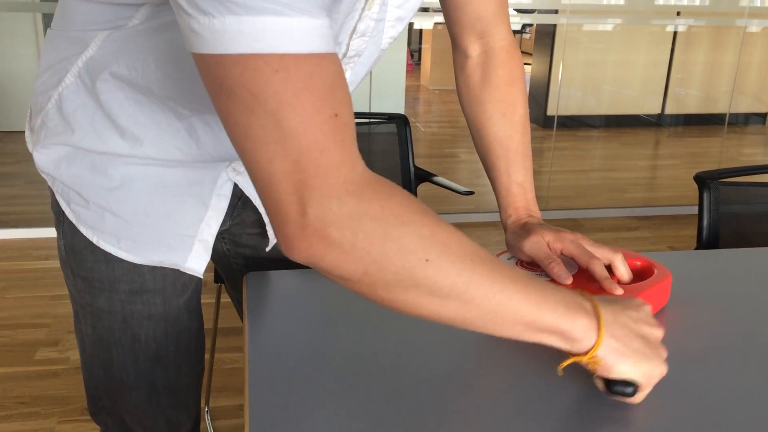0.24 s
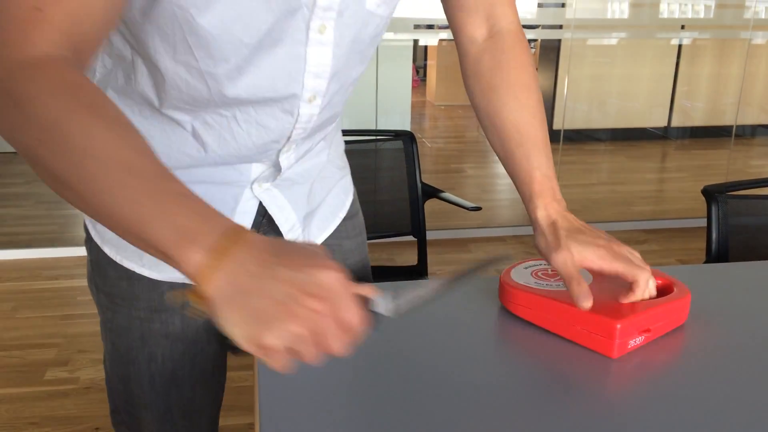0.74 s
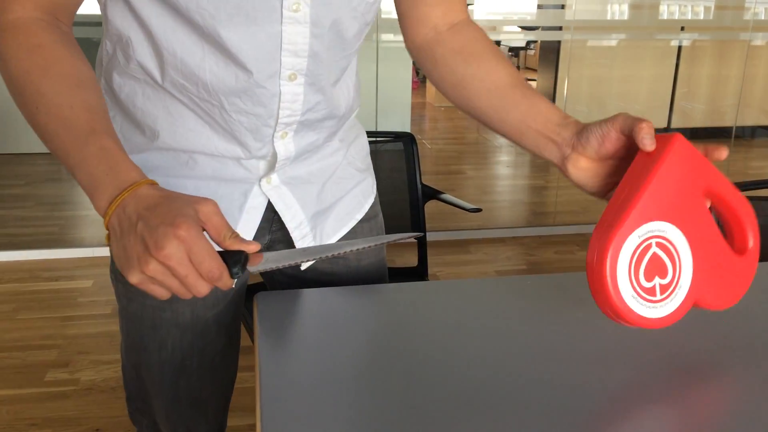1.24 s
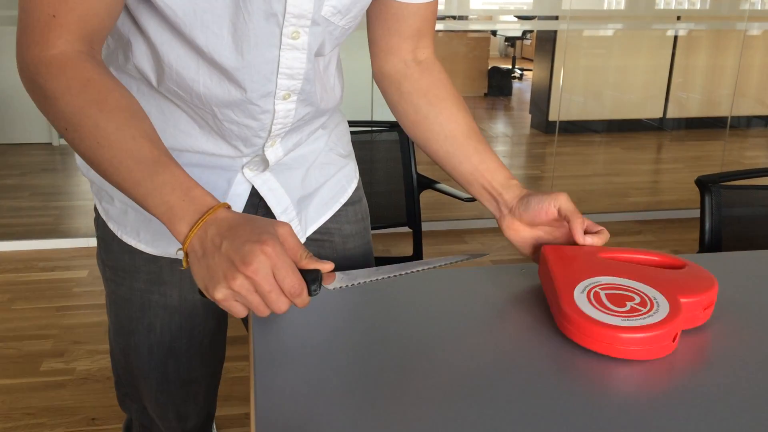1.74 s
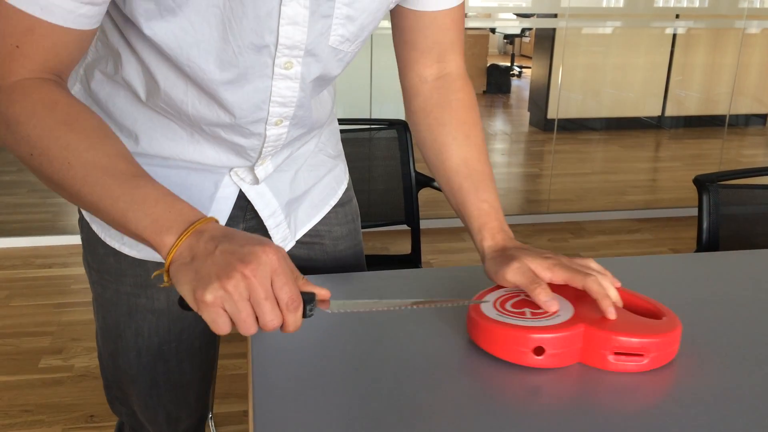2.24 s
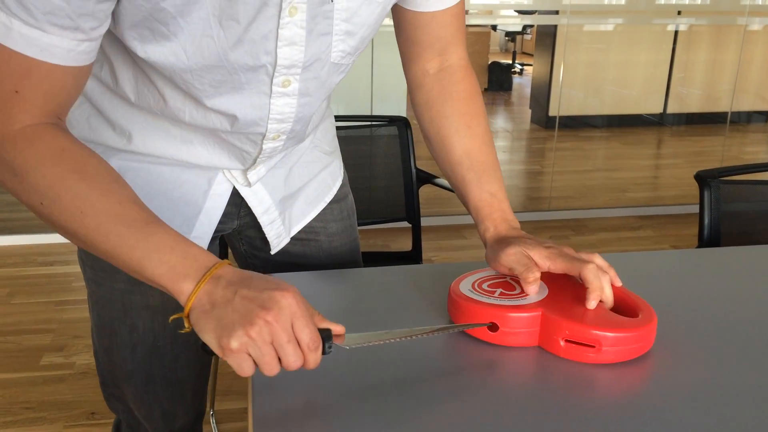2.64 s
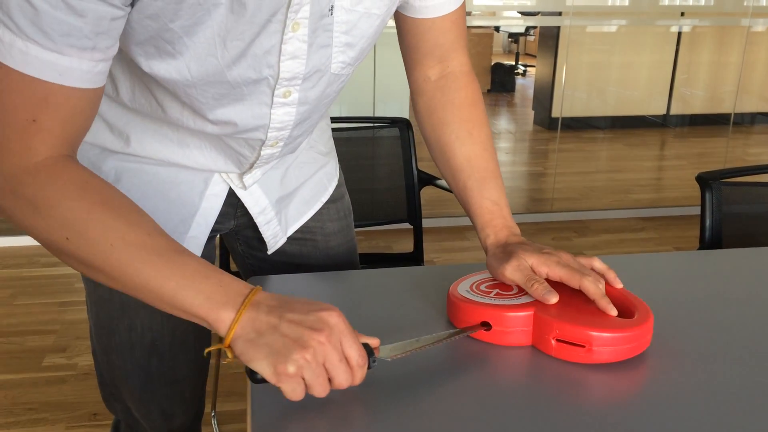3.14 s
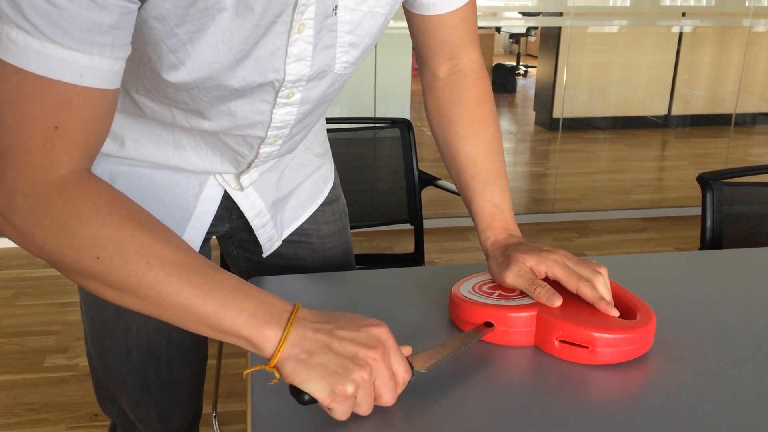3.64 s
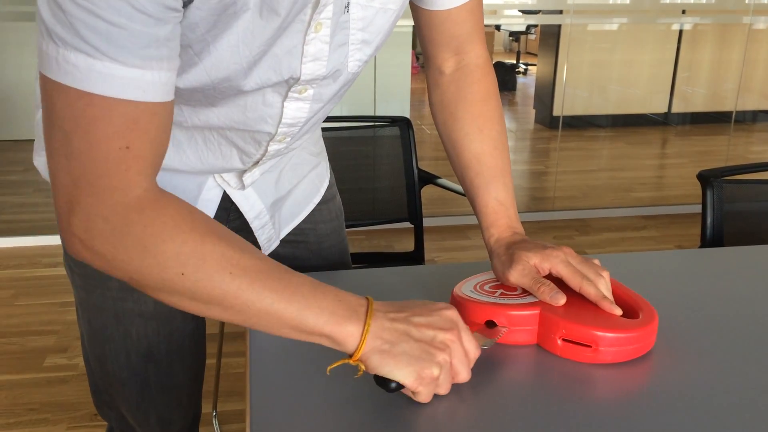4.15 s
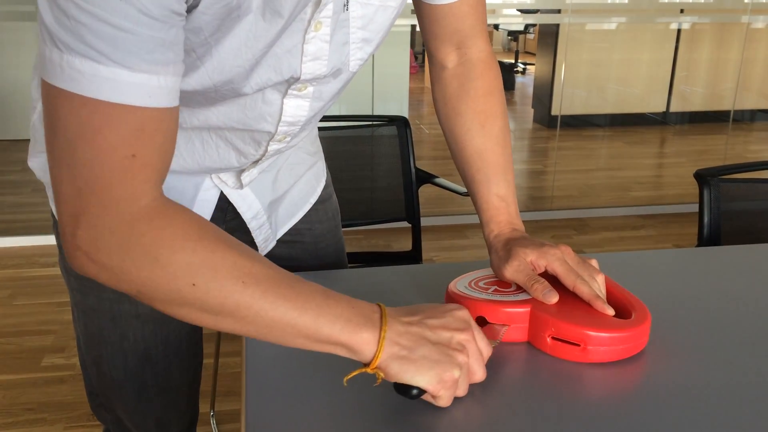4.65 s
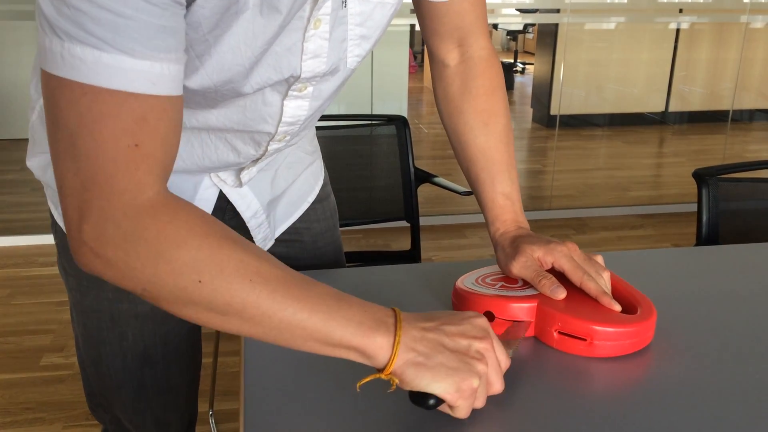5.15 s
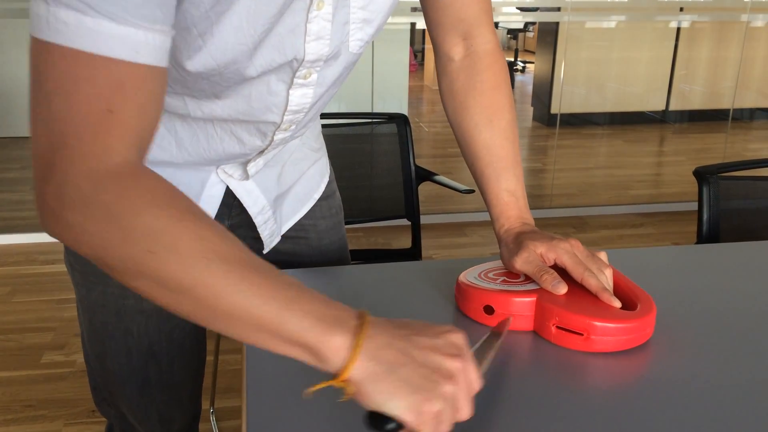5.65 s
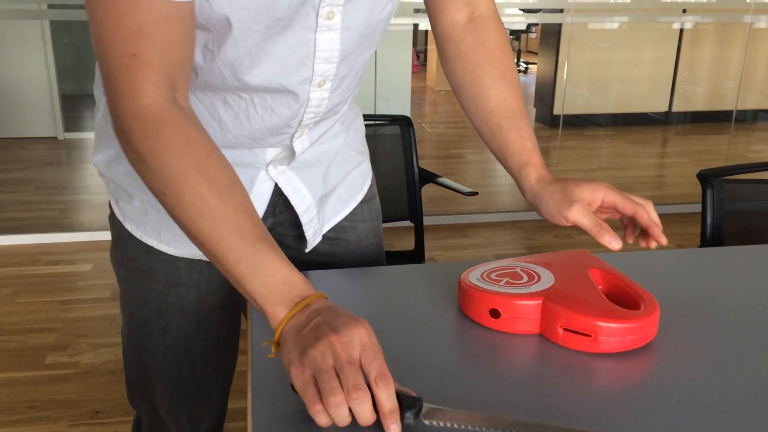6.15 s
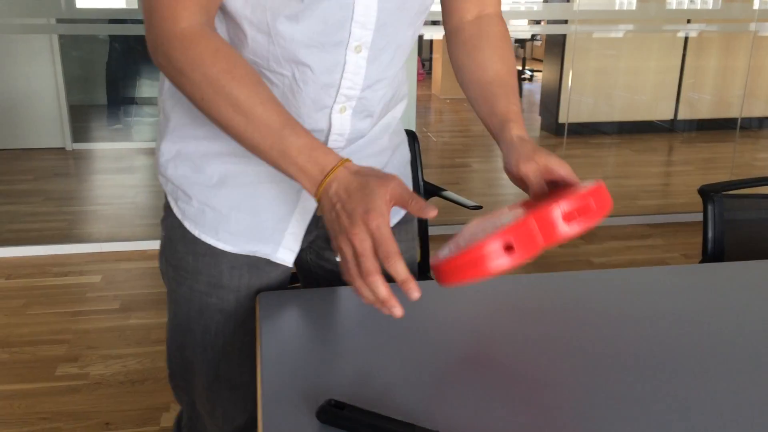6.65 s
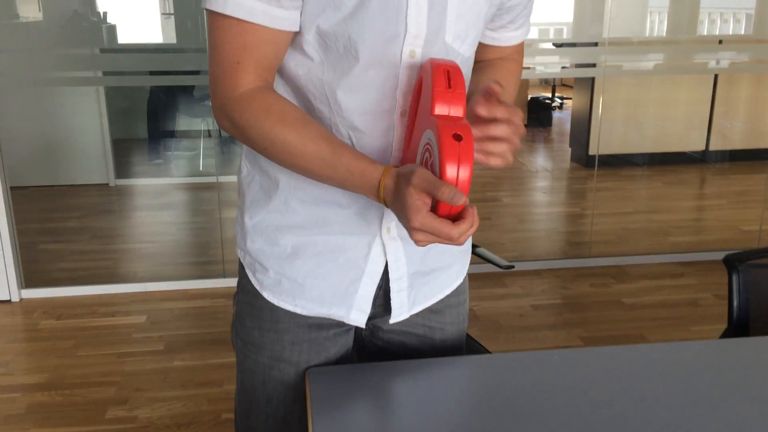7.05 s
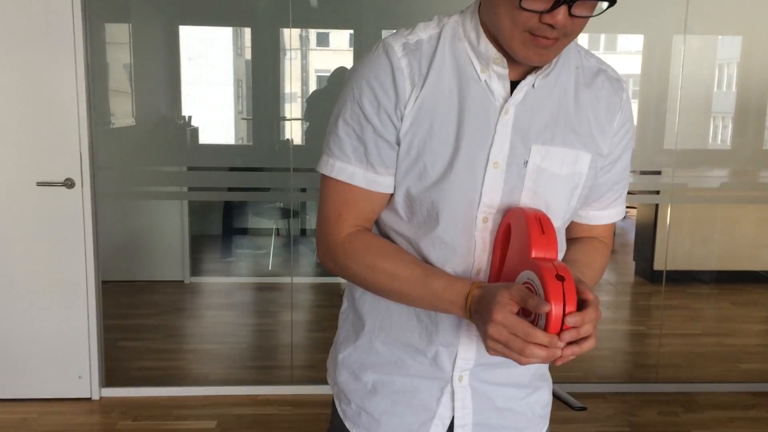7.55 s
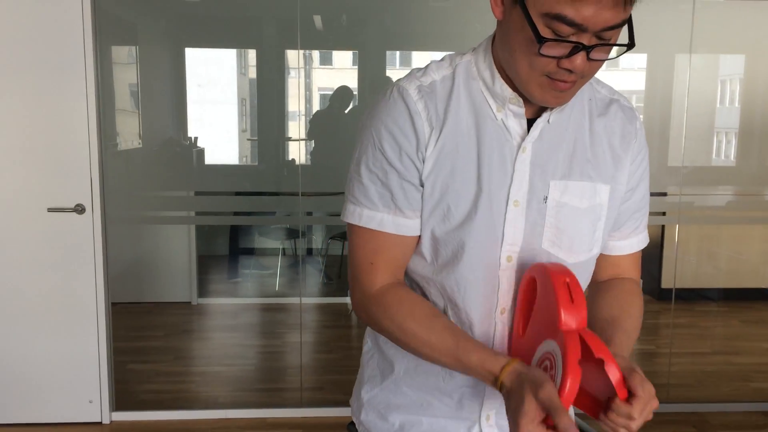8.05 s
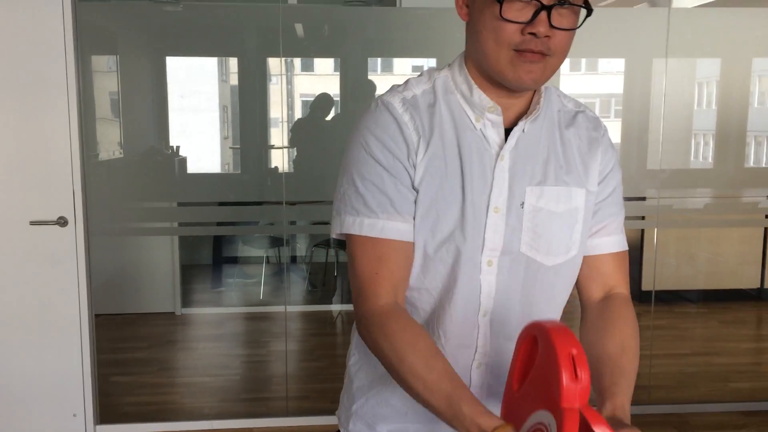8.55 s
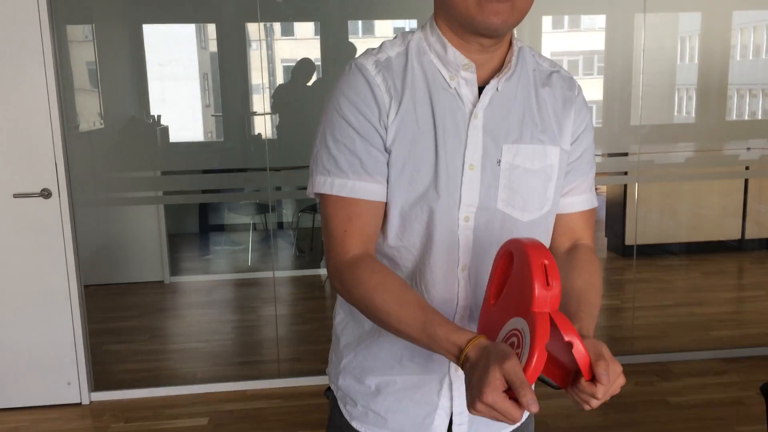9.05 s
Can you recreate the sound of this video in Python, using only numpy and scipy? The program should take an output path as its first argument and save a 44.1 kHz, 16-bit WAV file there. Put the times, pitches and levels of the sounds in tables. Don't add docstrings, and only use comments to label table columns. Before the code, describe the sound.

A knife rasps out of a hollow plastic sharpener, which clunks down and slides, is worked again, then snaps open loudly in a quiet room.

```python
import sys
import numpy as np
from scipy import signal
from scipy.fft import rfft, irfft, next_fast_len
from scipy.io import wavfile

SR = 44100
rng = np.random.default_rng(int(sys.argv[2]) if len(sys.argv) > 2 else 0)


def boost_factor(decibels):
    exponent = np.asarray(decibels, float) / 20
    return 10 ** exponent


def transcribe(signal):
    frames = np.atleast_2d(signal).T
    limited = np.clip(frames, -1, 1)
    pcm = np.round(limited * 32767).astype(np.int16)
    wavfile.write(sys.argv[1], SR, pcm)


N = 410571

# freq_hz, density_db_per_hz
AIR_SPECTRUM = [(20, -21.5), (45, -8.5), (134, -5.5), (357, -20), (527, -28.5), (1290, -32.5), (5080, -42),
                (6720, -42.5), (16000, -47.5)]
# centre_hz, t60_s, tail_db
ROOM_BANDS = [(123, 0.43, 1), (273, 0.31, -8.5), (700, 0.58, -12), (1570, 0.66, -17), (3000, 0.66, -20.5),
              (6000, 0.36, -19), (11580, 0.24, -21.5)]
# delay_s, level_db
GLASS_ECHOES = [(0.033, -25), (.039, -20.5), (.068, -25.5), (0.086, -22.5)]

# freq_hz, level_db, t60_s
TABLE_MODES = [(60, -12.5, 0.18), (87, -7, 0.43), (132.2, -3, 0.4), (183.4, 4.5, 0.23), (230, 6, 0.28)]
SHELL_ON_TABLE_MODES = [
    [(263, -7, 0.075), (376, 0.5, 0.038), (528, 0.5, 0.041), (572, 2, 0.024), (740, -6.5, 0.011)],
    [(860, -11.5, 0.015), (1100, -1.5, 0.013), (1520, -4, 0.011), (2100, -6.5, 0.0017)],
    [(3700, 13, 0.0026), (5240, -25, 0.012)],
]
HANDLE_MODES = [
    [(420, -6, 0.05), (735, -15, 0.0076)],
    [(779, 1, 0.025), (1070, 2.5, 0.013), (1263, 2, 0.025), (1870, -1, 0.0027)],
    [(2780, 6.5, 0.0049), (4040, 6, 0.0031), (6100, -2.5, 0.0059)],
]
SHELL_IN_HAND_MODES = [
    [(372, -15.5, 0.038), (700, 5, 0.014), (821, 2, 0.007)],
    [(1000, 3, 0.0065), (1250, 6, 0.019), (2000, 3, 0.0035)],
    [(2840, -5, 0.00079), (4100, -4.5, 0.0086), (6014, -1.5, 0.0011)],
]
SHELL_HELD_MODES = [
    [(290, 2.5, 0.03), (398, 14, 0.018), (460, 14, 0.023), (565, 9.5, 0.013), (760, -14.5, 0.0098)],
    [(1037, 4.5, 0.015), (1461, 5, 0.0065), (1864, 4, 0.0078), (2400, 2, 0.0062)],
    [(3170, 2, 0.0031), (4030, -0.5, 0.0035), (5170, -9, 0.0042), (6500, -16.5, 0.005)],
]
# freq_hz, level_db, t60_s
LIFTED_HOLLOW_MODES = [(430, 6, 0.0085), (535, 3.5, 0.052), (588, -8, 0.08), (747, 1, 0.021)]
# freq_hz, level_db, t60_s
EDGE_MODES = [(1150, -1.5, .006), (1800, -0.5, 0.0069), (2670, 1, 0.0031), (4030, 4, 0.0043),
              (5700, 0, 0.0035), (8200, -13.5, .0015), (11500, -13, 0.00093)]
TIP_MODES = [(990, -5.5, 0.044), (1620, -8, 0.065), (1800, -0.5, 0.06)]
BLADE_MODES = [(3140, 3.5, .012), (3630, -2, .008), (5390, -5.5, 0.0035)]

# start_s, level_db
TABLE_THUMPS = [(0.254, -32), (1.449, -25.5), (1.472, -24), (1.522, -31), (1.657, -47.5), (1.894, -32),
                (1.948, -23.5), (2.003, -26.5), (2.047, -25.5), (2.185, -35), (3.911, -30), (4.06, -47),
                (5.181, -44), (5.96, -43.5), (6.406, -37.5), (6.463, -41), (6.822, -34.5)]
# start_s, hollow_db, walls_db, edges_db, struck_spot_hz
SHELL_SET_DOWNS = [(1.446, -14.5, -17, -29.5, 580), (1.468, -28.5, -28.5, -45, 610),
                   (1.521, -22.5, -29.5, -45.5, 700), (1.572, -36.5, -41.5, -70, 800),
                   (1.79, -54, -57, -71, 535), (1.896, -36, -28.5, -43, 1190),
                   (1.95, -17.5, -24.5, -31.5, 460), (1.968, -30, -35, -50, 400),
                   (1.986, -38, -34.5, -50, 460), (2.014, -21, -29, -51, 480), (2.105, -44, -59, -65, 298),
                   (2.006, -20, -26, -36.5, 463), (2.046, -20.5, -30, -37.5, 497),
                   (2.068, -28, -36, -51, 585), (2.085, -34, -38.5, -62, 424),
                   (1.955, -15, -21.5, -42, 625)]
HANDLE_HITS = [
    (6.404, -44.5, -27.5, -40, 1960),
    (6.421, -38.5, -21, -38, 1500),
    (6.463, -44.5, -26.5, -43, 1760),
    (6.482, -40, -31, -60.5, 900),
    (6.518, -47, -40.5, -63.5, 750),
    (0.845, -47.5, -35, -34, 720),
]
CATCH_RELEASE = [
    (8.632, -62.5, -57.5, -78, 2320),
    (8.644, -44.5, -54, -70.5, 3015),
    (8.656, -12.5, -14.5, -17, 1103),
]
FINGER_TAPS = [(1.068, -48, -72, -72, 430), (1.09, -56, -52, -57, 700), (1.229, -31.5, -35, -43, 576),
               (1.385, -57, -59, -63, 550), (6.828, -31, -24, -24.5, 430), (7.4, -42, -41.5, -64.5, 1060),
               (7.449, -73.5, -65, -66, 930), (7.506, -49, -59, -63, 434), (7.644, -86, -64.5, -65.5, 2370),
               (7.835, -37, -36.5, -40, 543), (7.973, -53, -53.5, -56, 2100),
               (8.168, -78, -63.5, -59, 4100), (8.439, -83, -65, -63, 1934)]
FIRST_SLOT_HITS = [
    (0.048, -34, -60, -48, 700),
    (0.215, -36, -61, -41, 1300),
    (0.241, -28.5, -33.5, -31.5, 1110),
    (0.251, -26, -28, -23.5, 5000),
    (0.608, -30.5, -60, -51, 3170),
    (0.629, -36, -29.5, -34.5, 3060),
]
SECOND_SLOT_HITS = [(2.912, -57.5, -57.5, -60.5, 632), (2.996, -57.5, -59, -67, 2400),
                    (3.178, -51.5, -50, -83, 1630), (3.24, -70, -46.5, -68, 1840),
                    (3.284, -39, -44, -47.5, 2450), (3.773, -42.5, -41.5, -77, 457),
                    (3.888, -38, -43, -55.5, 1110), (3.911, -13, -20.5, -18.5, 300),
                    (3.99, -30.5, -30, -50, 1470), (4.283, -30.5, -28, -39, 2280),
                    (4.437, -41.5, -78, -54, 420), (4.5, -40, -49, -53, 1020),
                    (5.075, -35.5, -36.5, -62, 420), (5.399, -37.5, -53, -46.5, 1725),
                    (5.687, -33, -36.5, -38, 740), (5.704, -60.5, -28.5, -49, 1500),
                    (5.724, -63, -47, -28, 4100), (5.767, -44, -62, -45, 453),
                    (5.883, -39.5, -45, -51.5, 1150), (5.963, -27.5, -26.5, -37, 420),
                    (6.107, -48, -77, -56.5, 615)]
# start_s, level_db, pitch_hz
EDGE_TICKS = [(.09, -49, 3350), (0.244, -37, 11000), (.252, -26, 11050), (.077, -52, 3400),
              (0.459, -51, 3000), (0.468, -40, 3200), (0.541, -37, 3500), (0.574, -40, 2500),
              (0.629, -42, 3000), (1.068, -59, 1103), (1.228, -53, 1692), (1.352, -66, 3570),
              (1.447, -44, 10860), (1.95, -35, 11100), (2.007, -45.5, 8970), (2.046, -48, 9000),
              (3.741, -55.5, 2000), (3.764, -56, 3000), (5.707, -30, 2000), (3.913, -25, 4000),
              (3.99, -43, 1800), (4.076, -46, 5000), (4.135, -56, 5050), (4.283, -30.5, 2400),
              (4.497, -42, 3000), (4.527, -55, 3400), (4.552, -47, 2800), (4.589, -47, 3000),
              (4.698, -51, 6500), (4.736, -62, 3000), (8.644, -52, 9000), (4.939, -43, 3000),
              (4.97, -52, 3470), (5.011, -55, 3000), (5.054, -49, 2500), (5.127, -54, 1500),
              (5.14, -36, 1500), (5.16, -46, 2500), (5.179, -37, 1510), (5.188, -31, 1310),
              (0.956, -41.5, 1060), (5.73, -31, 3480), (5.966, -32.5, 1060), (0.789, -42, 1100),
              (6.476, -42, 1205), (.851, -33, 2000), (6.62, -38, 1400), (6.64, -48, 1480),
              (6.829, -27.5, 1800), (7.401, -49.5, 1150), (7.837, -30.5, 8750)]

# time_s, level_db
TIP_SONG_CURVE = [(3.1, -74), (3.17, -59.5), (3.3, -50.5), (3.419, -63.5), (3.52, -69), (3.559, -83)]
PUSH_SONG_CURVE = [(.04, -67), (.075, -47), (.095, -49.5), (.115, -58)]
DRAW_SONG_CURVE = [(.45, -65), (.465, -45), (.53, -37.5), (.547, -30), (.58, -48), (.595, -56), (.608, -47),
                   (.625, -59)]

# peak_s, rise_s, fall_s, wall_rasp_db, drone_re_rasp_db
HAND_STROKES = [(.39, 0.065, 0.11, -54, -13), (.65, .01, .035, -55.5, -9), (.79, .015, 0.017, -53, -5),
                (.847, .008, .02, -43, -9.5), (.81, 0.39, 0.16, -59.5, 0), (.87, 0.049, 0.066, -56.5, -7),
                (.955, 0.059, 0.046, -48, -4.5), (.995, 0.032, 0.034, -53.5, -8.5),
                (1.018, 0.028, 0.043, -59, 2.5), (1.13, 0.16, 0.96, -60.5, 12),
                (1.29, 0.055, 0.036, -59.5, -16.5), (1.6, .015, 0.14, -53.5, 5),
                (1.77, 0.15, 0.15, -67.5, 20.5), (6.075, 0.07, 0.11, -58, -3),
                (7.0, 0.98, 0.34, -57.5, -21.5), (7.3, 0.066, 0.057, -59, -10),
                (7.858, 0.02, 0.041, -52, 10), (7.98, 0.098, 0.14, -53.5, 3),
                (8.145, 0.039, 0.041, -54, -13)]
SLIDE_STROKES = [(2.245, 0.063, 0.16, -34, -3.5), (2.34, 0.071, 0.046, -38.5, -7),
                 (2.5, 0.7, 0.22, -55, -0.5), (2.7, 0.056, 0.11, -59, 4.5),
                 (2.79, 0.044, 0.061, -60.5, 5.5), (3.916, 0.0034, .04, -42, -3),
                 (6.565, 0.012, 0.12, -51, 11), (7.1, 0.034, 0.036, -61.5, 5),
                 (7.765, .06, 0.077, -59.5, 2)]
DULL_STROKES = [(1.884, 0.025, 0.055, -51, 16.5), (1.91, 0.0056, 0.025, -34, 14),
                (2.19, 0.06, 0.047, -48, 14.5), (3.265, 0.24, 0.16, -53, -0.5),
                (3.4, 0.35, 0.23, -61.5, -7.5), (3.54, 0.036, 0.027, -55.5, 9.5),
                (5.172, 0.073, 0.057, -27.5, -1.5), (6.482, 0.014, .035, -41, 4),
                (6.575, .02, 0.021, -51, 6), (6.44, 0.05, 0.075, -47, 15.5), (6.51, 0.027, 0.04, -44, 3),
                (6.548, 0.016, .03, -46, 5), (6.625, 0.029, 0.025, -44.5, 1.5),
                (6.858, 0.0073, 0.019, -50, -4)]
SLOT_STROKES = [(0.088, 0.16, 0.045, -39.5, -3.5), (0.238, 0.091, 0.02, -39.5, -3),
                (0.263, 0.0069, 0.031, -38, -30), (0.28, 0.066, 0.031, -46, 17.5),
                (.453, 0.015, 0.036, -48, 9.5), (0.485, 0.058, 0.041, -36.5, 0.5),
                (.52, 0.062, 0.048, -34, -4), (.547, 0.013, 0.052, -28.5, -10),
                (0.572, 0.027, 0.022, -27, -8), (0.605, 0.017, 0.042, -44.5, 3),
                (1.25, 0.017, 0.037, -45, -11.5), (3.775, 0.04, 0.032, -47.5, 3),
                (3.812, 0.037, 0.026, -44, 8), (3.89, 0.01, 0.026, -43, 4), (3.929, 0.023, 0.025, -30.5, 7),
                (3.997, 0.095, 0.012, -45, 3), (4.05, 0.16, 0.33, -39.5, 1), (3.96, .04, 0.085, -39.5, -1),
                (5.375, 0.028, 0.021, -50.5, -10), (5.455, .04, .03, -55.5, 3),
                (4.27, 0.04, 0.022, -55, -19), (4.298, 0.013, 0.03, -49, -16),
                (4.338, 0.065, 0.066, -45, -9.5), (4.24, 0.0092, 0.014, -56.5, 15),
                (4.52, 0.13, 0.12, -43.5, -2.5), (4.595, 0.081, 0.048, -48, 1),
                (4.76, 0.089, 0.08, -44.5, 0.5), (4.83, 0.013, 0.011, -61.5, 20),
                (4.87, 0.027, 0.056, -54, -15), (4.95, 0.057, 0.052, -41, -6.5),
                (4.99, 0.048, 0.066, -39.5, -6.5), (5.022, 0.067, 0.037, -41, -2),
                (5.068, 0.021, 0.022, -49, 10.5), (5.406, 0.088, 0.085, -46.5, 0.5),
                (5.645, 0.067, 0.086, -47, -4.5), (5.705, 0.041, 0.057, -27.5, -14.5),
                (5.728, 0.043, 0.048, -30.5, -20), (5.755, 0.025, 0.018, -37.5, -6.5)]
# freq_hz, density_db_per_hz
GRIT_SPECTRUM = [(1000, -12), (4000, 0), (6000, -2.5), (9000, -6.5), (12000, -10.5), (16000, -9.5)]

STROKE_DEPTH_DB, STROKE_ROUNDNESS = 23, 1.49
GRIT_FOLLOWS, USUAL_RASP_DB = 1, -50.5
HARD_BLOW_DB, BRIGHTER_DB_PER_DB = -25.5, 0.18


def rms_one(x):
    return x / np.sqrt(np.mean(x ** 2) + 1e-20)


def butter(x, order, hz, kind):
    return signal.sosfilt(signal.butter(order, hz, kind, fs=SR, output="sos"), x)


def coloured(x, spectrum):
    size = next_fast_len(len(x))
    hz, db = np.transpose(spectrum)
    bin_hz = np.fft.rfftfreq(size, 1 / SR)
    gain = rms_one(boost_factor(np.interp(np.log(bin_hz + 1), np.log(hz), db)))
    return irfft(rfft(x, size) * gain, size)[:len(x)]


def drift(rate_hz):
    r = np.exp(-2 * np.pi * rate_hz / SR)
    return rms_one(signal.lfilter([1], [1, -2 * r, r * r], rng.standard_normal(N)))


def body(drive, modes):
    out, total_power = 0, 0
    for k, (hz, db, t60_s) in enumerate(modes):
        r = boost_factor(-60 / (t60_s * SR))
        w = 2 * np.pi * hz / SR
        gain = (-1) ** k * boost_factor(db) * np.sqrt((1 - r * r) / 2)
        poles = [1, -2 * r * np.cos(w), r * r]
        out = out + signal.lfilter([gain, 0, -gain], poles, drive(hz) + 1e-18)
        total_power += boost_factor(db) ** 2
    radiated_hz = [.65 * modes[0][0], 1.7 * modes[-1][0]]
    return butter(out, 2, radiated_hz, "band") / np.sqrt(total_power)


def chatter(s, db, length_s, spot_hz, swell, favour_db, lead=0, duller_db=0):
    size = 1024
    age = np.arange(1, size + 1) / SR / np.clip(length_s, 1e-6, .008)[:, None]
    shape = age ** swell * np.exp(-(age - age[:, :1]) * (1 + swell))
    uneven = boost_factor(3 * rng.standard_normal(age.shape))
    contacts = rng.standard_normal(age.shape) * uneven * shape
    burst_size = np.sqrt(np.sum(contacts ** 2, axis=1))
    contacts[:, 0] += lead * np.copysign(burst_size, contacts[:, 0])
    contacts *= np.sqrt(SR / 100 / np.sum(contacts ** 2, axis=1, keepdims=True))
    at = (s[:, None] * SR).astype(int) + np.arange(size)

    def drive(hz):
        octaves = np.log2(hz / spot_hz)
        near_spot = np.exp(-(octaves / .3) ** 2)
        gain = boost_factor(db + favour_db * near_spot - duller_db * np.maximum(octaves, 0))
        return np.bincount(at.ravel(), (contacts * gain[:, None]).ravel(), N + size)[:N]

    return drive


def knocks(rows, modes, length_s, crack_db, crack_hz, spread):
    s, hollow_db, walls_db, edge_db, spot_hz = np.transpose(rows)
    burst_s = spread * (length_s + 0 * s)
    lag_s = (1 - spread) * .0045
    hollow = chatter(s, hollow_db, burst_s, spot_hz, swell=0.15, favour_db=8.5, lead=0.11)
    walls = chatter(s + lag_s, walls_db - 1.5, burst_s, spot_hz, swell=0.23, favour_db=8.0, lead=0.56)
    edges = chatter(s + 2 * lag_s, edge_db - 4.5, 0.81 * burst_s, spot_hz,
                    swell=0.083, favour_db=4.5, lead=.3)
    out = body(hollow, modes[0]) + body(walls, modes[1]) + body(edges, modes[2])
    force_db = BRIGHTER_DB_PER_DB * (edge_db - HARD_BLOW_DB)
    crack = chatter(s, edge_db + crack_db + force_db, .2 * burst_s, spot_hz, swell=.1, favour_db=0)(1)
    crack = butter(crack, 2, 1400, "high")
    return out + butter(crack, 2, crack_hz, "low")


def grains(per_s, size_db, clump_db):
    sizes = boost_factor(size_db * np.minimum(rng.exponential(1, N), 4)) * rng.choice([-1, 1], N)
    happens = rng.random(N) < per_s / SR
    return rms_one(sizes * happens * boost_factor(clump_db * drift(22)))


def strokes(rows, grit_db):
    level = np.zeros((3, N))
    for s, rise_s, fall_s, db, drone_db in rows:
        at = np.arange(max(int((s - rise_s) * SR), 0), int((s + fall_s) * SR))
        away = np.abs(at / SR - s) / np.where(at / SR < s, rise_s, fall_s)
        rasp_db = db - STROKE_DEPTH_DB * away ** STROKE_ROUNDNESS
        hiss_db = USUAL_RASP_DB + grit_db + GRIT_FOLLOWS * (rasp_db - USUAL_RASP_DB)
        ends = np.clip(10 * (1 - away), 0, 1)
        level[:, at] += boost_factor(np.array([rasp_db + drone_db, rasp_db, hiss_db])) * ends
    return level


def air_handling():
    level_db = -59 + 0.35 * drift(2.0)
    return boost_factor(level_db) * rms_one(coloured(rng.standard_normal(N), AIR_SPECTRUM))


def room(x):
    t = np.arange(SR) / SR
    tail = 0
    for hz, t60_s, db in ROOM_BANDS:
        band = butter(rng.standard_normal(SR), 2, [hz / 1.15, min(hz * 1.77, 19000)], "band")
        unit_energy = np.sqrt(2 * np.log(1000) / t60_s / SR)
        tail = tail + band * boost_factor(db - 60 * t / t60_s) * unit_energy
    tail = tail * np.clip((t - .004) / 0.0061, 0, 1)
    for delay_s, db in GLASS_ECHOES:
        tail[int(delay_s * SR)] += boost_factor(db - 16.0)
    return signal.fftconvolve(x, tail)[:N]


def table_thumps():
    s, db = np.transpose(TABLE_THUMPS)
    push = np.abs(chatter(s, db - 13.0, 0.0012 + 0 * s, 186, swell=0.31, favour_db=0)(1))
    return body(lambda hz: push, TABLE_MODES)


def table_knocks(spread):
    shell = knocks(SHELL_SET_DOWNS, SHELL_ON_TABLE_MODES, length_s=0.013,
                   crack_db=2.0, crack_hz=7260, spread=spread)
    handle = knocks(HANDLE_HITS, HANDLE_MODES, length_s=0.042,
                    crack_db=-0.5, crack_hz=4900, spread=spread)
    return shell + handle


def finger_taps(spread):
    modes = (LIFTED_HOLLOW_MODES, *SHELL_HELD_MODES[1:])
    return knocks(FINGER_TAPS, modes, length_s=0.0084, crack_db=-17.5, crack_hz=5840, spread=spread)


def catch_snap(spread):
    return knocks(CATCH_RELEASE, SHELL_IN_HAND_MODES, length_s=0.0039,
                  crack_db=0.5, crack_hz=7020, spread=spread)


def blade_knocks(spread):
    rows = list(FIRST_SLOT_HITS) + list(SECOND_SLOT_HITS)
    return knocks(rows, SHELL_HELD_MODES, length_s=0.008, crack_db=-5, crack_hz=6190, spread=spread)


def all_knocks(spread, aloft_db):
    on_table_or_held = table_knocks(spread) + finger_taps(spread) + blade_knocks(spread)
    return on_table_or_held + boost_factor(aloft_db) * catch_snap(spread)


def edge_ticks():
    s, db, hz = np.transpose(EDGE_TICKS)
    contacts = chatter(s, db - 12.0, 0.00023 + 0 * s, hz, swell=0.12, favour_db=16, duller_db=5.5)
    return body(contacts, EDGE_MODES)


def song_level(curve):
    return boost_factor(np.interp(np.arange(N) / SR, *np.transpose(curve), -200, -200))


def blade_song():
    slips = grains(3000, size_db=2.5, clump_db=2.2)
    tip_drive = slips * song_level(TIP_SONG_CURVE)
    blade_drive = slips * (song_level(PUSH_SONG_CURVE) + song_level(DRAW_SONG_CURVE))
    return body(lambda hz: tip_drive, TIP_MODES) + body(lambda hz: blade_drive, BLADE_MODES)


def rubbing():
    resting = strokes(SLOT_STROKES, grit_db=-20.5)
    resting += strokes(DULL_STROKES, grit_db=-29.5)
    resting += strokes(SLIDE_STROKES, grit_db=-6.5)
    lifted = strokes(HAND_STROKES, grit_db=-13.5)
    _, rasp_gain, grit_gain = resting + lifted
    slips = grains(2500, size_db=1.0, clump_db=1.7)
    grit = grains(8300, size_db=3.0, clump_db=1.5)
    bumps = grains(500, size_db=2.5, clump_db=1.8)

    hollow, walls, edges = SHELL_HELD_MODES
    finger_damped = [(hz, db, 0.49 * t60_s) for hz, db, t60_s in LIFTED_HOLLOW_MODES]
    drone = body(lambda hz: bumps * resting[0], hollow)
    drone += body(lambda hz: bumps * lifted[0], finger_damped)
    drone += boost_factor(-16.0) * body(lambda hz: bumps * resting[0], TABLE_MODES)

    rubbed = [(hz, db, 1.1 * t60_s) for hz, db, t60_s in walls + edges]
    rasp = body(lambda hz: slips * rasp_gain * boost_factor(2.1 * drift(30)), rubbed)
    return drone + boost_factor(-4.0) * rasp + coloured(grit, GRIT_SPECTRUM) * grit_gain


def scene():
    friction = rubbing() + blade_song() + edge_ticks()
    direct = all_knocks(spread=1.0, aloft_db=0.5) + table_thumps() + friction
    reverberant = room(all_knocks(spread=0, aloft_db=13.0) + friction)
    return (direct + reverberant + air_handling())[None]


def band_limit(x):
    return signal.sosfilt(signal.butter(12, 16810, fs=SR, output="sos"), x)


def record(dry):
    duck_above, duck_db, hold = .58, -7, int(.27 * SR)
    mix = butter(dry, 2, 45, "high")
    loud_count = np.cumsum(np.abs(mix[0]) > duck_above)
    recently_loud = loud_count > np.concatenate([np.zeros(hold), loud_count[:-hold]])
    mix = mix * boost_factor(duck_db * signal.lfilter([.001], [1, -.999], recently_loud))
    ceiling = .8
    return band_limit(ceiling * np.tanh(mix / ceiling))


dry = scene()
out = record(dry)
transcribe(out)
```